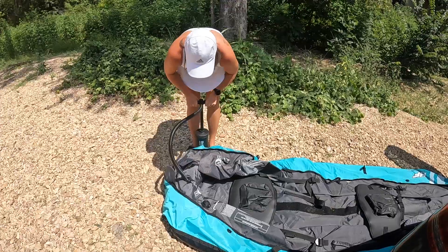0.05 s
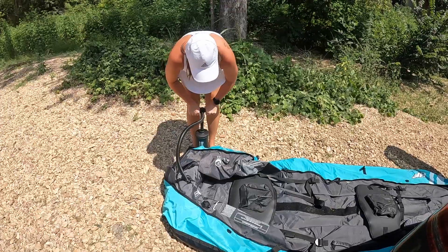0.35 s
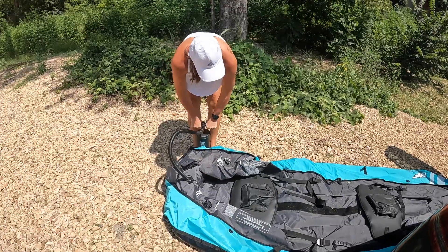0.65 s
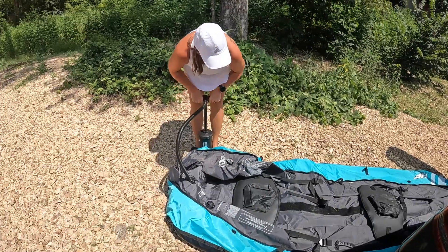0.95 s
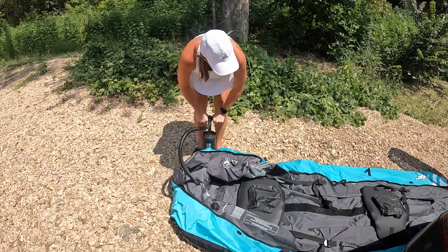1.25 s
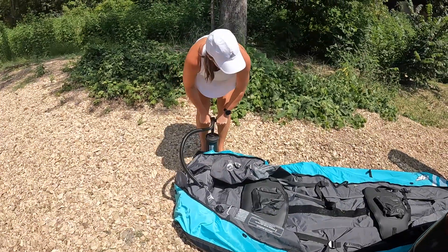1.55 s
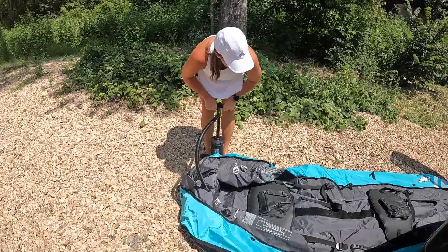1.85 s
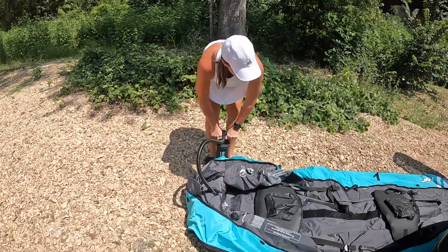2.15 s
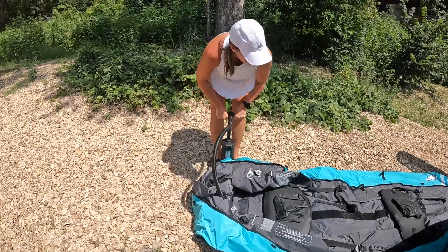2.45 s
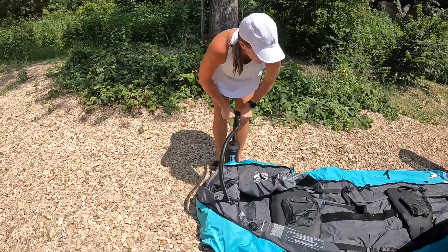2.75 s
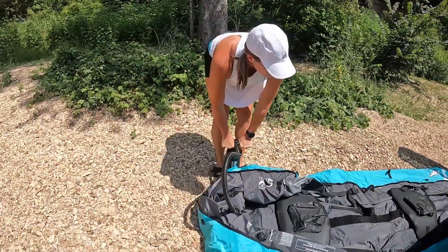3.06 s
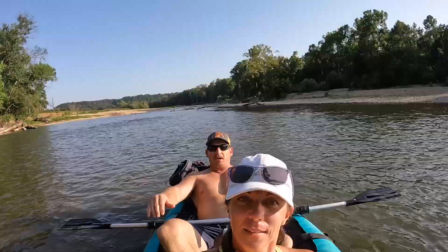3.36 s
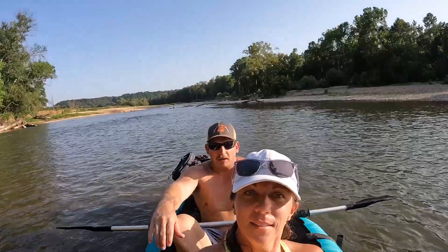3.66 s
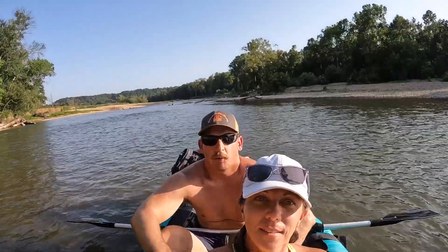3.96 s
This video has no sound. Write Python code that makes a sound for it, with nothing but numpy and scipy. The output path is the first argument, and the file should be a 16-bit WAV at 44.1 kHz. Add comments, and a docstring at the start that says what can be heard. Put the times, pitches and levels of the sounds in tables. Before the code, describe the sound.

Rhythmic hand pump strokes rush and clunk outdoors, cutting to insects and soft lapping water.

```python
"""An engine idles nearby while a double-action hand pump fills a kayak on a gravel bank.
On each push and pull, turbulent air rushes through the valves, at times with a breathy whistle.
At every turn the piston knocks and sets the pump body ringing; past halfway, gravel shifts under it.
At about 3.4 s the scene changes abruptly to the open river, where insects hiss in the trees,
water laps at the hull and a distant tone swells and fades."""
import sys
import numpy as np
from scipy import signal
from scipy.fft import rfft, irfft
from scipy.io import wavfile

SR = 44100
rng = np.random.default_rng(int(sys.argv[2]) if len(sys.argv) > 2 else 0)


def store_pcm(level_fs):
    """Save levels as 16-bit WAV."""
    pcm = np.round(np.clip(level_fs, -1, 1) * 32767).astype(np.int16)
    wavfile.write(sys.argv[1], SR, np.atleast_2d(pcm).T)


N = 176400
TIME, FREQ = np.arange(N) / SR, np.fft.rfftfreq(N, 1 / SR)
SCENE_CHANGE_S, CUTOFF_HZ = 3.395, 14200

# Stereo images. Each row: frequency in Hz, left minus right in dB, side minus mid in dB.
BANK_STEREO = [(130, 0, -32), (400, -1.5, -16), (3000, -.7, -13), (13000, 3, -8)]
RIVER_STEREO = [(400, -1.5, -18), (1800, 0, -16), (3200, 2.6, -5)]
# Open-air background on the bank. Each row: frequency in Hz, relative spectral density in dB.
BANK_SPECTRUM = [(190, 1), (350, -13.5), (900, -20), (7800, -35), (9000, -44), (14000, -56)]

# Idling speed of the engine. Each row: time in seconds, cycles per second.
IDLE_SPEED = [(.25, 23.2), (1.05, 22.1), (1.35, 23.8), (1.7, 21.5), (2.45, 23.2), (3.0, 21.6), (3.4, 22.1)]
# Its two strong orders. Each row: time in seconds, level of the third in dB, of the fourth in dB.
STRONG_ORDERS = [(0, -20, -26), (.35, -19, -30.5), (1.05, -28.5, -22.5), (1.35, -22, -32), (2.05, -25, -23),
                 (3.35, -27.5, -23.5)]
# Its weaker orders. Each row: multiple of the cycle rate, level in dB.
WEAK_ORDERS = [(2, -40.5), (5, -33.5), (6, -36.5), (7, -45), (8, -39)]

# Piston strokes. Each row: start, fastest moment and end in seconds, level at full speed in dB,
# drop at the start in dB, drop at the end in dB.
PUSH_STROKES = [(-.1, 0.029, 0.23, -25.5, 4, 5), (0.73, 0.856, 1.069, -29.5, 8.5, 6),
                (1.539, 1.691, 1.901, -30, 9, 15), (2.35, 2.524, 2.684, -30.5, 5, 6),
                (3.2, 3.341, 3.51, -29.5, 7, 10)]
PULL_STROKES = [(0.306, 0.468, 0.65, -30.5, 6.2, 2.1), (1.153, 1.27, 1.471, -33, 4.2, 0.69),
                (1.95, 2.093, 2.305, -34.5, 7, 2.06), (2.766, 2.943, 3.149, -33, 7, 4.07)]
VALVE_OPEN_S, VALVE_CLOSE_S = 0.0032, 0.007
# Rushing air. Each row: frequency in Hz, relative spectral density in dB.
JET_SPECTRUM = [(200, -10), (1450, -6), (1720, 0), (2600, -2.5), (4300, -11), (6600, -14), (8200, -16),
                (9000, -19.5), (11300, -19.5), (14000, -35)]
# Resonances of the valves and tube. Each row: centre in Hz, width in Hz, level against the jet in dB.
TUBE_RESONANCES = [(1878, 72, -13.5), (3410, 100, -16.5), (7670, 320, -17)]
# Resonances of the outlet valve. Each row: centre when slow in Hz, centre at full speed in Hz,
# width in Hz, level against the stroke in dB.
OUTLET_RESONANCES = [(1764, 2450, 160, -8), (7330, 8400, 1000, -16.5)]
# Whistles of the flow. Each row: time of the peak in seconds, pitch in Hz, level at strong flow in dB.
FLOW_WHISTLES = [(.04, 1750, -30.5), (.84, 8030, -35), (1.025, 4340, -37), (1.61, 7830, -36.5),
                 (1.705, 2418, -29), (2.405, 7900, -41), (2.535, 2320, -29.5)]
WHISTLE_S, WHISTLE_WIDTH_SHARE, WHISTLE_FALL_OCT_PER_S = 0.028, 0.047, 1.2

# Modes of the pump body. Each row: frequency in Hz, relative level in dB, time to fall 60 dB in seconds.
BODY_MODES = [(222, -1.5, 0.065), (346, -5.5, 0.055), (479, 2.5, 0.037), (578, -1, 0.028), (687, -4, 0.018),
              (1040, -17, 0.033), (1670, -3, 0.0029), (2350, -15, 0.012)]
# The piston hits a stop or takes up its play. Each row: start in seconds, level in dB,
# centre of the contact's spectrum in Hz.
PISTON_KNOCKS = [(0.2105, -9.5, 1200), (0.3223, -15.5, 266), (0.394, -18.5, 700), (0.6233, -7.5, 500),
                 (.652, -15.5, 205), (0.7318, -14, 780), (1.055, -12.5, 1310), (1.1519, -18.5, 267),
                 (1.4483, -7.5, 487), (1.477, -18, 200), (1.5487, -16, 649.3), (1.9475, -17.5, 268),
                 (2.2665, -10.5, 605.4), (2.661, -13.5, 1290), (2.774, -21, 352), (3.107, -8.5, 700),
                 (3.2042, -20.5, 700)]
CONTACT_WIDTH = 1.31   # bandwidth of a contact over its centre
CHATTER_DB, CHATTER_T60_S = -23.5, 0.037   # loose parts chatter after each contact
# The handle and loose plastic parts tick at the turns. Each row: start in seconds, level in dB.
HANDLE_TICKS = [(0.7234, -26.5), (1.1394, -30), (2.345, -25), (2.6601, -16.5), (2.7112, -28)]
SNAP_LOW_HZ, SNAP_HIGH_HZ, SNAP_T60_S = 1250, 3800, 0.0082
# The valve flap slaps early in a push. Each row: start in seconds, level in dB.
FLAP_SLAPS = [(0.7516, -11), (1.5661, -13.5), (2.3704, -13), (3.2233, -12)]

# Gravel shifts. Each row: time of the peak in seconds, level in dB, Gaussian spread in seconds.
GRAVEL_CRUNCHES = [(2.262, -25.5, 0.0076), (2.289, -30.5, 0.0052)]
# Grit of the crunches. Each row: frequency in Hz, relative spectral density in dB.
GRAVEL_SPECTRUM = [(2000, -8.5), (5200, 1.5), (9000, -30)]

# Insects and water on the river. Each row: frequency in Hz, relative spectral density in dB.
INSECT_SPECTRUM = [(2400, -17.5), (3400, -5), (5500, -0.5), (7500, -14), (8700, -27.5), (14000, -36.5)]
WATER_SPECTRUM = [(80, 1.5), (400, -6.5), (900, -13.5), (2800, -21)]
# Swell of the lapping. Each row: time in seconds, relative level in dB.
WATER_SWELL = [(3.42, -49.5), (3.54, -42.5), (3.66, -43), (3.8, -52.5)]


def from_db(db):
    """Amplitude grows tenfold for every 20 dB."""
    return 10 ** (np.asarray(db) / 20)


def rms_one(x):
    """Division by the root mean square gives a signal unit power."""
    return x / np.sqrt(np.mean(x ** 2) + 1e-20)


def in_time(rows):
    """Linear interpolation gives each column of a curve at every sample."""
    s, *columns = np.transpose(rows)
    return [np.interp(TIME, s, c) for c in columns]


def in_hz(rows):
    """Interpolation over log frequency gives each column of a spectrum at every bin."""
    hz, *columns = np.transpose(rows)
    return [np.interp(np.log(FREQ + 1), np.log(hz), c) for c in columns]


def drift(rate_hz):
    """Low-passed noise is a random fluctuation; rms 1."""
    return rms_one(irfft(rfft(rng.standard_normal(N)) / (1 + (FREQ / rate_hz) ** 2), N))


def pan(db):
    """A level difference between left and right places a source."""
    return from_db(np.array([[1], [-1]]) * db / 2)


def noise(spectrum, image):
    """Filtering colours white noise, and an independent side signal widens it; rms 1."""
    mid, side = rfft(rng.standard_normal((2, N)))
    pan_db, side_db = in_hz(image)
    both = (mid + from_db(side_db) * side * [[1], [-1]]) * pan(pan_db)
    return rms_one(irfft(both * from_db(in_hz(spectrum)[0]), N))


def breathy_tone(hz, width_hz):
    """A narrow resonance driven by noise gives a tone of random amplitude and phase; rms 1."""
    phase = 2 * np.pi * np.cumsum(hz + np.zeros(N)) / SR
    return rms_one(drift(width_hz / 2) * np.cos(phase) + drift(width_hz / 2) * np.sin(phase))


def swell(peak_s, spread_s):
    """A Gaussian envelope rises and falls symmetrically; peak 1."""
    return np.exp(-.5 * ((TIME - peak_s) / spread_s) ** 2)


def add(track, s, sound):
    """Superposition: a sound starting at s seconds adds to the track."""
    i = int(s * SR)
    track[i:i + len(sound)] += sound[:N - i]


def engine(waver_db=3, dispersion_rad=1.4):
    """Harmonics of the cycle rate beat together; dispersion in the pipe delays the higher ones more."""
    third_db, fourth_db = in_time(STRONG_ORDERS)
    phase = 2 * np.pi * np.cumsum(in_time(IDLE_SPEED)[0]) / SR
    orders = [(3, third_db), (4, fourth_db)]
    orders += [(round(k), db + waver_db * drift(13.7)) for k, db in WEAK_ORDERS]
    return np.sqrt(2) * sum(from_db(db) * np.cos(k * phase - dispersion_rad * k ** 2) for k, db in orders)


def airflow(strokes):
    """Valves gate a flow that arches with piston speed: gives gain, dB against full speed, speed 0-1."""
    gain, slack_db, speed = np.zeros((3, N))
    for start, fastest, end, db, start_drop_db, end_drop_db in strokes:
        span_s = np.where(TIME < fastest, fastest - start, end - fastest)
        place = np.clip((TIME - fastest) / span_s, -1, 1)
        arch_db = -np.where(place < 0, start_drop_db, end_drop_db) * place ** 2
        opening = .5 + .5 * np.tanh((TIME - start) / VALVE_OPEN_S)
        closing = .5 + .5 * np.tanh((end - TIME) / VALVE_CLOSE_S)
        valve = opening * closing
        gain += valve * from_db(db + arch_db)
        slack_db += valve * arch_db
        speed += 1 - place ** 2
    return gain, slack_db, speed


def air_rush(flicker_db=3, wander_hz=89.2, treble_hz=4470, turbulence_db=1.14):
    """Turbulence in the valves excites wavering resonances; faster air is louder and brighter."""
    gain, slack_db, _ = airflow(PUSH_STROKES + PULL_STROKES)
    jet = noise(JET_SPECTRUM, BANK_STEREO)
    for hz, width_hz, db in TUBE_RESONANCES:
        strength = from_db(db + flicker_db * drift(28))
        jet += strength * breathy_tone(hz + wander_hz * drift(5.6), width_hz)
    low = irfft(rfft(jet) / (1 + (FREQ / treble_hz) ** 4), N)
    treble = jet - low
    low_db, treble_db = (turbulence_db * drift(16) for _ in range(2))
    return gain * (low * from_db(low_db) + treble * from_db(treble_db + slack_db))


def outlet_valve():
    """On a push the flow excites hollow resonances, whose pitch rises with piston speed."""
    gain, _, speed = airflow(PUSH_STROKES)
    return gain * sum(from_db(db) * breathy_tone(slow_hz + (fast_hz - slow_hz) * speed ** 2, width_hz)
                      for slow_hz, fast_hz, width_hz, db in OUTLET_RESONANCES)


def whistles():
    """The flow locks briefly into an oscillation of falling pitch, which sounds only while air moves."""
    flowing = np.tanh(airflow(PUSH_STROKES + PULL_STROKES)[0] / from_db(-32))
    out = np.zeros(N)
    for s, hz, db in FLOW_WHISTLES:
        falling_hz = hz * 2 ** (-WHISTLE_FALL_OCT_PER_S * (TIME - s))
        out += from_db(db) * swell(s, WHISTLE_S) * breathy_tone(falling_hz, WHISTLE_WIDTH_SHARE * hz)
    return flowing * out


def echoes(x, db=-20.5, t60_s=0.21):
    """Scattering from the ground and bushes returns a faint decaying tail, different on each side."""
    tail = rng.standard_normal((2, SR // 2)) * from_db(-60 * TIME[:SR // 2] / t60_s)
    tail /= np.sqrt(np.sum(tail[0] ** 2))
    return from_db(db) * signal.fftconvolve(x, tail, axes=1)[:, :N]


def soften(x):
    """The compliance of plastic makes a contact act as a low-pass filter."""
    return signal.sosfilt(signal.butter(2, SNAP_HIGH_HZ, fs=SR, output="sos"), x)


def ring(x, hz, t60):
    """A damped mode answers an impulse with an exponentially decaying sine."""
    r, w = from_db(-60 / (t60 * SR)), 2 * np.pi * hz / SR
    return signal.lfilter([0, np.sin(w)], [1, -2 * r * np.cos(w), r * r], x + 1e-18)


def knock(contact_hz):
    """A chattering impact excites the body's modes, most strongly those near contact_hz; peak 1."""
    chatter = rng.standard_normal(SR // 5) * from_db(CHATTER_DB - 60 * TIME[:SR // 5] / CHATTER_T60_S)
    force = soften(signal.unit_impulse(len(chatter)) + chatter)
    sound = 0
    for hz, db, t60 in BODY_MODES:
        detuning = (hz / contact_hz - contact_hz / hz) / CONTACT_WIDTH
        strength = from_db(db + rng.normal(0, 1.1)) / (1 + detuning ** 4)
        sound = sound + strength * ring(force, hz, t60)
    return sound / np.abs(sound).max()


def snap():
    """Hard plastic cracks in a band of noise that is damped within milliseconds; peak 1."""
    burst = rng.standard_normal(SR // 20) * from_db(-60 * TIME[:SR // 20] / SNAP_T60_S)
    band = signal.butter(2, [SNAP_LOW_HZ, SNAP_HIGH_HZ], "band", fs=SR, output="sos")
    sound = signal.sosfilt(band, soften(burst))
    return sound / np.abs(sound).max()


def pump_impacts(flap_hz=1130, bounce_s=0.00162, flap_snap_db=-8.5):
    """Impacts radiate transients: the piston knocks, the handle ticks, the flap slaps and rebounds."""
    out = np.zeros(N)
    for s, db, contact_hz in PISTON_KNOCKS:
        add(out, s, from_db(db) * knock(contact_hz))
    for s, db in FLAP_SLAPS:
        for delay in (0, bounce_s):
            add(out, s + delay, from_db(db) * knock(flap_hz))
            add(out, s + delay, from_db(db + flap_snap_db) * snap())
    for s, db in HANDLE_TICKS:
        add(out, s, from_db(db) * snap())
    return out * pan(db=-1.9)


def gravel(grit_db=6.4):
    """Friction between stones shifting under the pump gives short bursts of rough noise."""
    envelope = sum(from_db(db) * swell(s, spread_s) for s, db, spread_s in GRAVEL_CRUNCHES)
    return envelope * rms_one(noise(GRAVEL_SPECTRUM, BANK_STEREO) * from_db(grit_db * drift(400)))


def insects():
    """Many incoherent calls merge into a steady hiss."""
    return from_db(-35) * noise(INSECT_SPECTRUM, RIVER_STEREO)


def water(gain_db=8.5, flutter_db=2.5):
    """Lapping at the hull is low noise, amplitude-modulated by a slow swell and a fast flutter."""
    wash = noise(WATER_SPECTRUM + [(4000, -58)], RIVER_STEREO)
    return wash * from_db(in_time(WATER_SWELL)[0] + gain_db + flutter_db * drift(85))


def distant_tone(peak_s=3.56, spread_s=0.074, db=-39.5):
    """Narrow-band noise is heard as a pitch, which swells and fades once."""
    envelope = from_db(db) / np.hypot(1, ((TIME - peak_s) / spread_s) ** 2)
    return envelope * breathy_tone(hz=1890, width_hz=420)


def scene():
    """Sources add in each place; a rapid equal-power crossfade leads from the bank to the river."""
    pump = air_rush() + outlet_valve() + whistles() + pump_impacts() + gravel()
    bank = pump + echoes(pump) + engine() + from_db(-34.5) * noise(BANK_SPECTRUM, BANK_STEREO)
    river = water() + insects() + distant_tone()
    afloat = .5 + .5 * np.tanh((TIME - SCENE_CHANGE_S) / 0.0021)
    return np.sqrt(1 - afloat) * bank + np.sqrt(afloat) * river


def record(dry):
    """Band limiting removes the lowest rumble and the highest treble."""
    dry = signal.sosfilt(signal.butter(2, 18, "high", fs=SR, output="sos"), dry)
    return signal.sosfilt(signal.ellip(10, .3, 80, CUTOFF_HZ, fs=SR, output="sos"), dry)


dry = scene()
out = record(dry)
store_pcm(out)
```